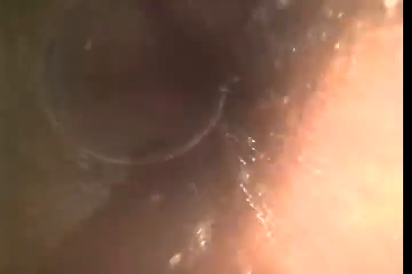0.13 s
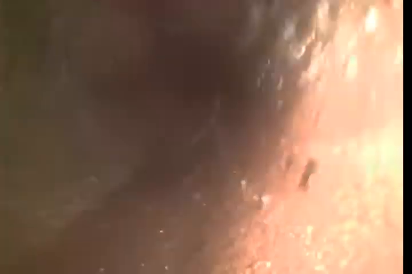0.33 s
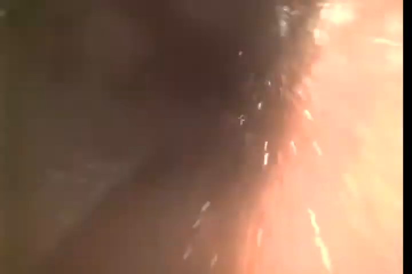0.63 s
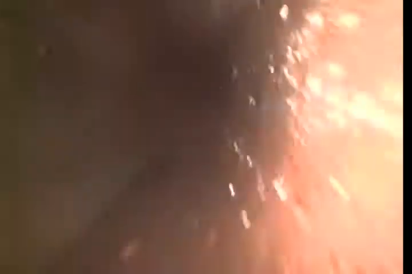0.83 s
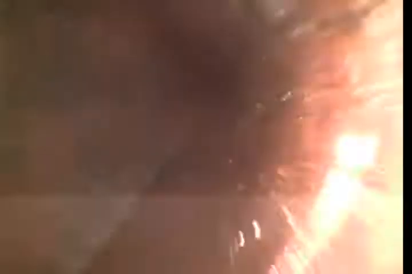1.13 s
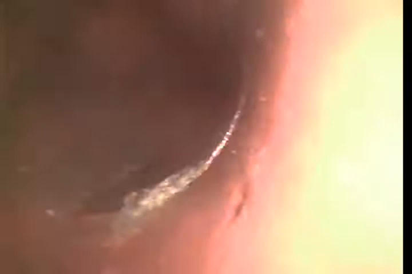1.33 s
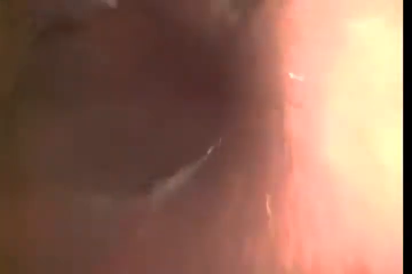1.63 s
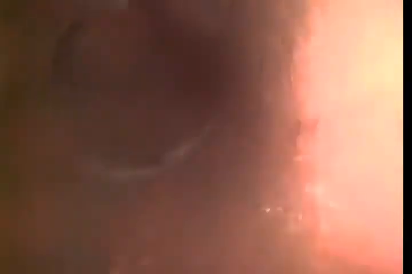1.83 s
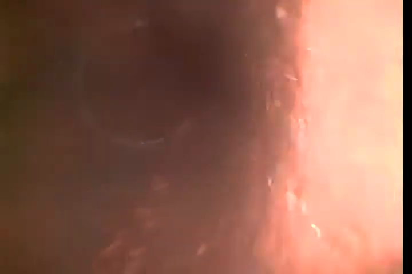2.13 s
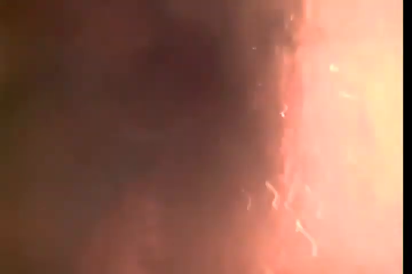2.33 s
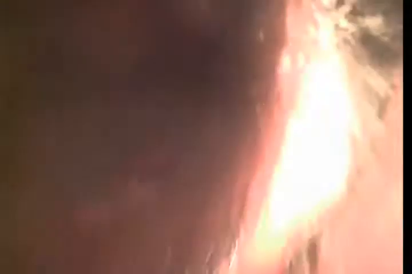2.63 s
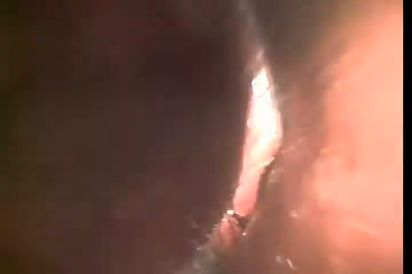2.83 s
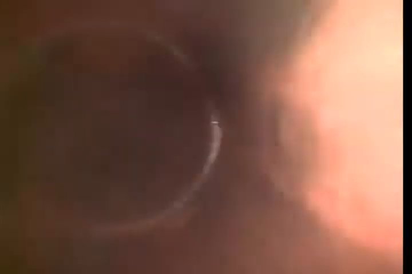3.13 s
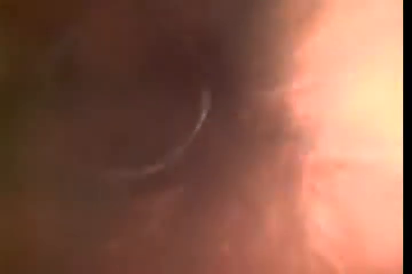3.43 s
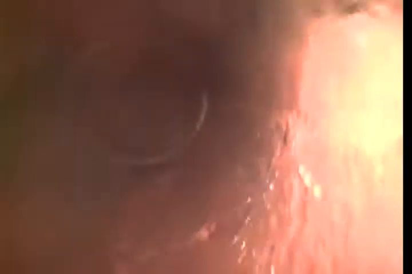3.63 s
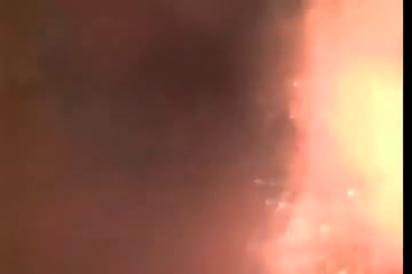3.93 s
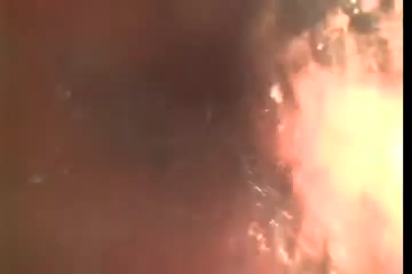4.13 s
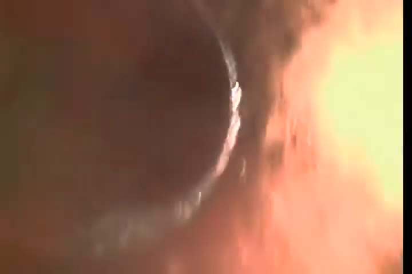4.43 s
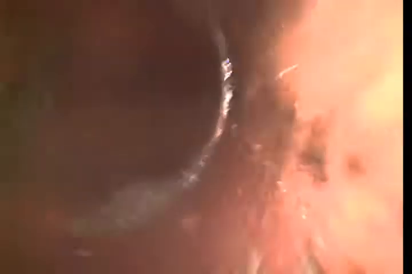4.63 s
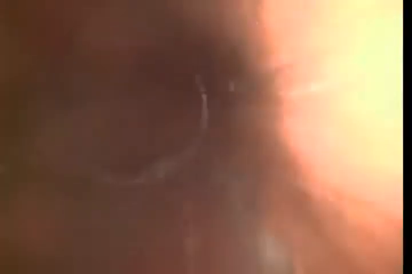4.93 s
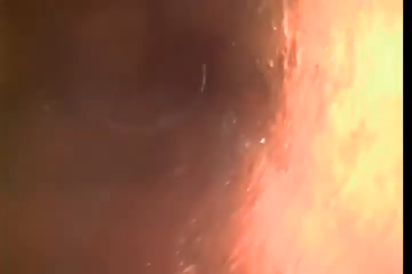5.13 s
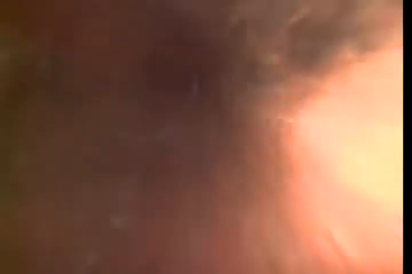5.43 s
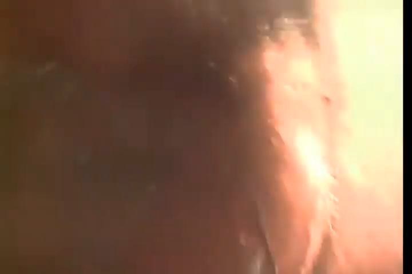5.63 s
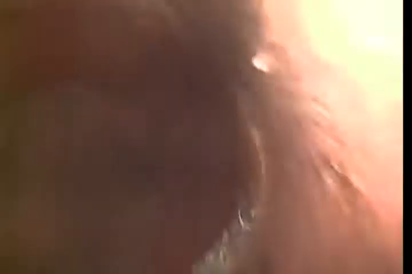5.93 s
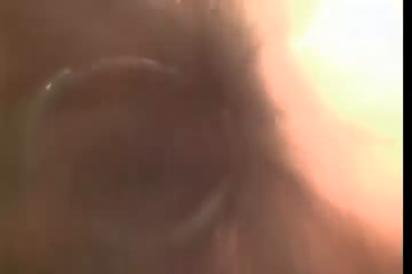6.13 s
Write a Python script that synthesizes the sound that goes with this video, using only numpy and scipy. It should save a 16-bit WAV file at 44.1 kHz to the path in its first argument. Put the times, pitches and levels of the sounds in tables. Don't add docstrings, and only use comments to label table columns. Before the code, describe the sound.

Dry raps and light ticks of a hauled cable over a low rumble, with a sudden overloaded clatter just before four seconds, then more knocking.

```python
import sys
import numpy as np
from scipy import signal
from scipy.fft import rfft, irfft, next_fast_len
from scipy.io import wavfile
from scipy.ndimage import uniform_filter1d

SR = 44100
rng = np.random.default_rng(int(sys.argv[2]) if len(sys.argv) > 2 else 0)


def store_wav(level_fs):
    pcm = np.round(np.clip(np.atleast_2d(level_fs), -1, 1) * 32767)
    wavfile.write(sys.argv[1], SR, pcm.T.astype(np.int16))


def invert_db(level):
    return 10 ** (np.asarray(level, dtype=float) / 20)


N = 276727


def rms_one(x):
    return x / np.sqrt(np.mean(x ** 2, axis=-1, keepdims=True) + 1e-20)


def drift(rate_hz):
    hop = 40
    pole = np.exp(-2 * np.pi * rate_hz * hop / SR)
    noise = rng.standard_normal(N // hop + 2002)
    slow = rms_one(signal.lfilter([1], [1, -2 * pole, pole ** 2], noise)[2000:])
    return np.interp(np.arange(N) / hop, np.arange(len(slow)), slow)


def grains(shape, spread_db):
    size_db = spread_db * np.minimum(rng.exponential(1, shape), 5)
    return rms_one(rng.standard_normal(shape) * invert_db(size_db))


def mode_bank(modes, size, least_width=0.045):
    hz, width_hz, level_db = np.transpose(modes)[:, :, None]
    z = np.exp(-2j * np.pi * np.arange(size // 2 + 1) / size)
    r = np.exp(-np.pi * np.maximum(width_hz, least_width * hz) / SR)
    poles = 1 - 2 * r * np.cos(2 * np.pi * hz / SR) * z + r * r * z * z
    response = (1 - r * r) / 2 * (1 - z * z) / poles
    sign = (-1.0) ** np.arange(len(modes))[:, None]
    return response * invert_db(level_db) * sign


def rumble():
    # resonance in Hz, width in Hz, level in dB.
    rumble_modes = [(43.3, 9.2, -8), (79.5, 26, -6), (124.1, 17, 1.5), (164, 48, -4.5)]
    size = next_fast_len(N)
    response = mode_bank(rumble_modes, size).sum(axis=0)
    noise = irfft(rfft(rng.standard_normal(size)) * response, size)[:N]
    return rms_one(noise) * invert_db(-45 + 1.3 * drift(2.1))


def drag(modes, grit_db, patchy_db):
    size = next_fast_len(N)
    rub = rfft(grains(N, grit_db), size)
    together = drift(12.0)
    out = np.zeros(N)
    for response in mode_bank(modes, size):
        swell_db = patchy_db * (0.7 * together + drift(22.0))
        out += irfft(rub * response, size)[:N] * invert_db(swell_db)
    return rms_one(out)


def effort(column, pull_db, gritty, shake_db):
    # time in seconds, pull level in dB, grittiness in dB.
    pull = [(0.0, -32, -2.5), (0.3, -35, 3.5), (1.89, -36, -2.5), (2.23, -35.5, 1), (2.58, -38.5, -3.5),
            (2.81, -35.5, 1), (3.07, -35.5, 1.5), (3.21, -28.5, -9), (3.3, -31.5, 0.5), (3.47, -33, -3),
            (3.72, -41, 2.5), (3.91, -16.5, -3), (4.09, -31.5, 6.5), (4.59, -32.5, 0), (5.05, -33.5, 2.5),
            (5.24, -36, -1), (6.04, -34.5, 7.5), (6.27, -35.5, 5)]
    rise_s, t60_s = 0.013, 1
    s, level_db, grit_db = np.transpose(pull)
    t = np.arange(N) / SR
    haul_db = pull_db + np.interp(t, s, level_db + gritty * grit_db)

    rows = contacts()
    power = invert_db(2 * (rows[:, column] + shake_db))
    kicks = np.bincount((rows[:, 0] * SR).astype(int), power, N)
    decay_t = t[:SR]
    decay = (1 - np.exp(-decay_t / rise_s)) * invert_db(-120 * decay_t / t60_s)
    shiver = signal.fftconvolve(kicks, decay)[:N]
    return np.sqrt(invert_db(2 * haul_db) + np.abs(shiver))


def contacts():
    # start in seconds, cage, drum and sheath in dB, bounce t60 in seconds.
    raps = [(.036, -23.5, -39, -47, .08), (.431, -16.5, -20.5, -27.5, 0.39), (.815, -19, -30.5, -46.5, .14),
            (1.831, -11.5, -12.5, -16.5, 0.11), (4.005, -7.5, -23, -22.5, .1), (4.2, -14, -23, -34, 0.069),
            (4.282, -6, -17.5, -23, 0.2), (4.544, -14, -22, -32, 0.29), (4.782, -19, -24.5, -45.5, 0.087),
            (4.89, -9.5, -21, -22, 0.35), (5.115, -15.5, -26, -38, 0.29), (5.205, -18, -25, -46, 0.082)]
    # start in seconds, sheath in dB, cage in dB.
    ticks = [(0.074, -27.5, -41), (.212, -25, -31), (.24, -22.5, -31), (0.713, -28.5, -22.5),
             (1.011, -23, -35), (1.216, -26.5, -23.5), (1.286, -31.5, -31), (1.363, -24, -26.5),
             (2.365, -27.5, -40), (2.424, -25, -29), (2.445, -25.5, -23), (2.595, -32, -50),
             (3.503, -29.5, -61), (4.35, -27, -39.5), (4.42, -29, -38), (4.732, -30.5, -60.5),
             (5.307, -35, -41), (5.537, -28.5, -38), (5.571, -35, -33.5), (6.129, -26, -35.5),
             (6.222, -32, -34.5)]
    # start in seconds, drum in dB, cage in dB.
    slumps = [(0.117, -29.5, -32), (.134, -27, -21), (.899, -41.5, -28), (1.453, -31, -21.5),
              (1.468, -23, -29.5), (1.511, -25.5, -27), (1.696, -29.5, -28.5), (2.25, -33.5, -43),
              (2.383, -25, -22.5), (3.041, -25, -30), (3.196, -32, -29), (3.7, -23, -18.5),
              (3.979, -33, -29), (4.822, -25.5, -19), (5.099, -41.5, -18), (5.426, -25, -28.5),
              (5.829, -31, -45.5), (5.998, -26, -20.5), (6.02, -25.5, -19.5)]
    # start in seconds, cage, drum and sheath in dB, bounce t60 in seconds.
    firm = [(1.027, -21.5, -31, -34, .1), (1.115, -7.5, -20.5, -19.5, 0.17),
            (1.154, -13.5, -22.5, -30.5, 0.15), (2.468, -18, -25, -23, 0.23),
            (2.509, -9, -18, -14.5, 0.066), (3.056, -21, -20, -34, 0.25), (3.084, -16.5, -20.5, -28, 0.2),
            (3.128, -20, -26.5, -17, 0.25), (3.666, -19, -21.5, -36.5, .15),
            (4.254, -14, -18.5, -28.5, 0.28), (5.128, -24.5, -23.5, -26.5, 0.11),
            (5.74, -14, -19.5, -26.5, 0.038), (6.054, -2.5, -11.5, -11, 0.031),
            (6.074, -33, -29, -23.5, 0.045)]
    # start in seconds, cage in dB, sheath in dB, bounce t60 in seconds.
    clatter = [(3.752, -6, -15.5, .25), (3.765, -11, -13, 0.093), (3.771, 2.5, -13.5, .06),
               (3.793, -12.5, -21.5, .13), (3.854, -4.5, -11.5, 0.18), (3.872, -4.5, -15.5, 0.16),
               (3.878, 5.5, -9, .15), (3.889, -0.5, -13, 0.11), (3.902, -10, -13, 0.15),
               (3.923, 0, -11.5, 0.068), (3.94, -9.5, -17, .2)]
    rows = [(*row, -0.88) for row in firm]
    rows += [(*row, 4) for row in raps]
    rows += [(s, cage_db, cage_db - 11.5, sheath_db, t60_s, -3.8) for s, cage_db, sheath_db, t60_s in clatter]
    rows += [(s, cage_db, sheath_db - 14.5, sheath_db, 0.069, 0) for s, sheath_db, cage_db in ticks]
    rows += [(s, cage_db, drum_db, drum_db - 11, 0.36, -5.5) for s, drum_db, cage_db in slumps]
    return np.array(rows)


def knocks(modes, contact, column, crack_s, rise_s, bounce_db, linger, vary_db, trim_db, low_hz, snap, late_ms):
    rows = contacts()
    size = contact.shape[1]
    t = np.arange(size) / SR
    hardness_db = rows[:, 5:]
    rise = 1 - np.exp(-t / (rise_s * invert_db(-1.5 * hardness_db)))
    t60_s = np.clip(linger * rows[:, 4:5], 0.01, 0.28)
    shape = rise * (np.exp(-t / crack_s) + invert_db(bounce_db - 60 * t / t60_s))

    strength = invert_db(vary_db * rng.standard_normal((len(rows), len(modes))))
    rings = irfft(rfft(contact * shape) * (strength @ mode_bank(modes, size)))
    high_pass = signal.butter(2, low_hz, "high", fs=SR, output="sos")
    rings = signal.sosfilt(high_pass, rings)
    rings = rings / np.sqrt(np.mean(rings[:, :900] ** 2, axis=1, keepdims=True))

    snap_hz, snap_s, snap_db = snap
    pitch_hz = snap_hz * (1 + 0.055 * rng.standard_normal((len(rows), 1)))
    pulse = t / snap_s * np.exp(1 - t / snap_s) * np.sin(2 * np.pi * pitch_hz * t)
    rings = rings + invert_db(snap_db + hardness_db) * pulse

    out = np.zeros(N + size)
    for row, ring in zip(rows, rings):
        at = round((row[0] - 0.0012 + late_ms / 1000) * SR)
        out[at:at + size] += ring * invert_db(row[column] + trim_db)
    return out[:N]


def cage(contact):
    # resonance in Hz, width in Hz, level in dB.
    cage_modes = [(564, 14, -13.5), (685, 67, -7.5), (732, 73, -1.5), (766.8, 62, 0.5), (830.5, 55, -4.5),
                  (892, 150, -10.5), (950, 52, -8.5), (1050, 66, -4.5), (1096, 230, -9.5), (1272, 120, -10),
                  (1424, 140, -6.5), (1502, 356, -9.5), (1690, 360, -16)]
    hits = knocks(cage_modes, contact, column=1, crack_s=0.0009, rise_s=0.0017, bounce_db=-10, linger=0.74,
                  vary_db=1.5, trim_db=-18.5, low_hz=295, snap=(790, 0.0016, 14), late_ms=0.8)
    rub = drag(cage_modes, grit_db=2.5, patchy_db=1.0)
    return hits, rub * effort(column=1, pull_db=-8.5, gritty=0.1, shake_db=-28.5)


def drum(contact):
    # resonance in Hz, width in Hz, level in dB.
    drum_modes = [(118.2, 19, -11), (219, 62.6, -7), (274.9, 45.2, 2), (299.7, 40.7, 0), (324.5, 35, -4),
                  (388, 15.2, -2), (437.8, 16, -7.5), (485, 150, -17)]
    hits = knocks(drum_modes, contact, column=2, crack_s=0.0073, rise_s=0.0024, bounce_db=-6.0, linger=1.3,
                  vary_db=2.0, trim_db=-8, low_hz=180, snap=(330, 0.002, 5), late_ms=1.2)
    rub = drag(drum_modes, grit_db=1.5, patchy_db=1.4)
    return hits, rub * effort(column=2, pull_db=-3, gritty=-0.6, shake_db=-17.5)


def sheath(contact):
    # resonance in Hz, width in Hz, level in dB.
    sheath_modes = [(2274, 67, -13), (2270, 180, -12), (2482, 360, -1.5), (2693, 517, 2), (2853, 286, 3),
                    (3199, 198, -1), (3293, 128, 0), (3537, 130, -5.5), (3875, 150, -8.5),
                    (4140, 540, -11.5), (4240, 110, -9.5)]
    hits = knocks(sheath_modes, contact, column=3, crack_s=0.0013, rise_s=0.002, bounce_db=-18, linger=1.0,
                  vary_db=2.5, trim_db=-9, low_hz=910, snap=(3100, 0.0008, 12), late_ms=-0.801)
    rub = drag(sheath_modes, grit_db=3.0, patchy_db=0.7)
    return hits, rub * effort(column=3, pull_db=-10, gritty=0.6, shake_db=-22)


def room(x):
    t60_s, build_s = 0.38, 0.0047
    t = np.arange(SR // 2) / SR
    tail = rng.standard_normal(len(t)) * invert_db(-60 * t / t60_s) * np.clip(t / build_s, 0, 1)
    return signal.fftconvolve(x, tail / np.sqrt(np.sum(tail ** 2)))[:N]


def squeaks():
    # start in seconds, length in seconds, pitch in Hz, level in dB.
    squeak_events = [(0.211, 0.027, 1520, -35.5), (0.275, 0.097, 1502, -48.5), (0.501, 0.4, 1084, -49),
                     (0.833, 0.15, 1044, -44.5), (2.72, 0.39, 1870, -59.5), (3.034, 0.095, 139, -29),
                     (3.039, 0.044, 430, -28.5), (3.04, 0.14, 508, -32.5), (3.079, 0.07, 385, -20),
                     (3.068, 0.13, 193, -48), (3.074, 0.066, 822, -34), (3.079, 0.043, 1063, -38),
                     (3.129, 0.069, 811, -31.5), (3.181, 0.28, 388, -34), (3.101, 0.37, 561.5, -41.5),
                     (4.734, 0.025, 1717, -42.5), (5.595, 0.26, 1423, -46.5), (5.819, 0.14, 1053, -51)]
    size = 16384
    out = np.zeros(N + size)
    for s, length_s, hz, level_db in squeak_events:
        response = mode_bank([(hz, 35, 0)], size, least_width=0)[0] ** 2
        tone = irfft(rfft(rng.standard_normal(size)) * response)
        swell = np.sin(np.pi * np.clip(np.arange(size) / SR / length_s, 0, 1) ** 0.45)
        gain = invert_db(level_db) * np.sqrt(length_s * SR / size)
        at = round(s * SR)
        out[at:at + size] += gain * rms_one(tone * swell)
    return out[:N]


def scene():
    contact = grains((len(contacts()), 8192), spread_db=4.0)
    cage_hits, cage_rub = cage(contact)
    drum_hits, drum_rub = drum(contact)
    sheath_hits, sheath_rub = sheath(contact)
    hits = cage_hits + drum_hits + sheath_hits
    rubbing = cage_rub + drum_rub + sheath_rub
    mix = rumble() + rubbing + hits + invert_db(-7.5) * room(hits) + squeaks()
    return mix[None]


def low_pass(x):
    return signal.sosfilt(signal.butter(12, 16000, fs=SR, output="sos"), x)


def record(dry):
    notch_hz, notch_width_hz = 2010, 240
    squash, skew, overload = 0.63, 0.62, 0.71
    run_in, fade = 2048, 64
    padded = np.pad(dry, ((0, 0), (run_in, 0)), "reflect")
    notched = signal.lfilter(*signal.iirnotch(notch_hz, notch_hz / notch_width_hz, fs=SR), padded)
    squashed = notched / (1 + (notched / squash) ** 4) ** 0.25
    thud = skew * uniform_filter1d(squashed ** 2, size=88)
    bent = signal.lfilter([1, -1], [1, -0.998], squashed + thud)
    dull = signal.sosfilt(signal.butter(14, 3942, fs=SR, output="sos"), bent)
    dull = signal.sosfilt(signal.ellip(10, 0.3, 80, 4450, fs=SR, output="sos"), dull)
    clipped = np.clip(dull[:, run_in:], -overload, overload)
    fade_out = np.minimum(np.arange(N)[::-1] / fade, 1)
    return low_pass(clipped * fade_out)


dry = scene()
out = record(dry)
store_wav(out)
```